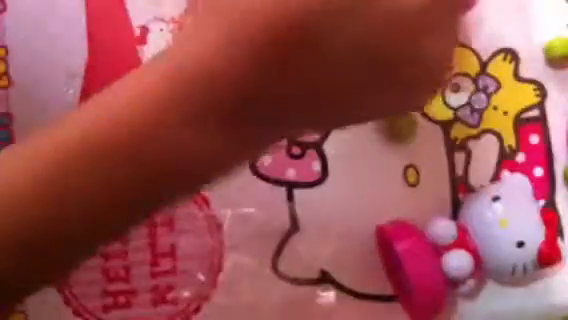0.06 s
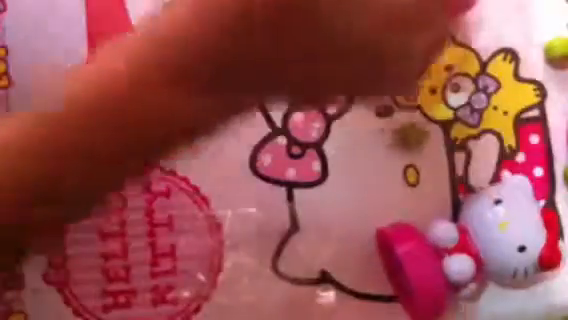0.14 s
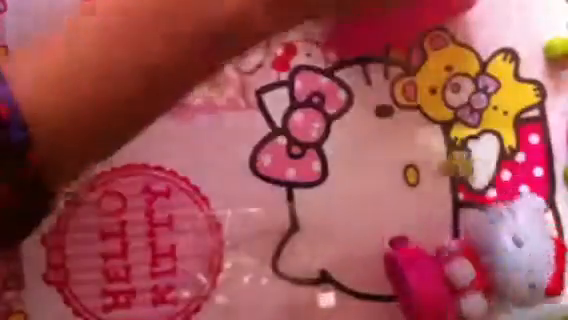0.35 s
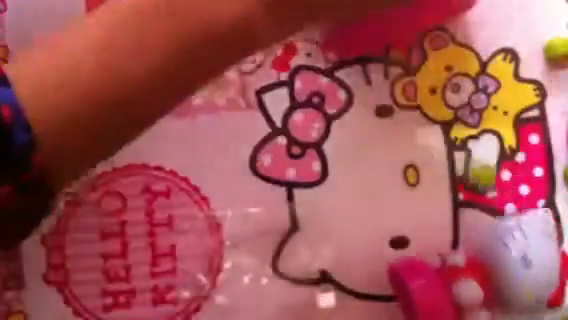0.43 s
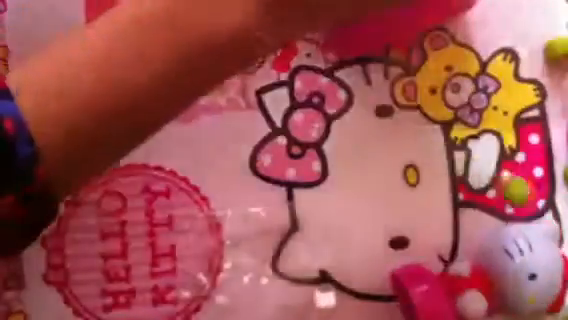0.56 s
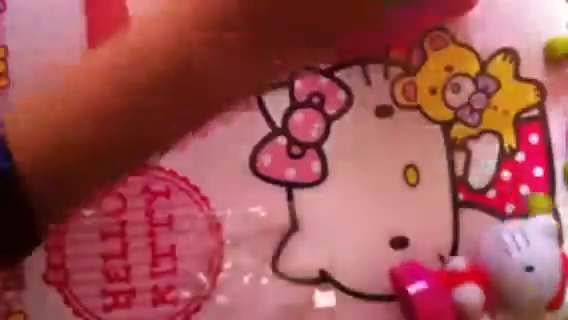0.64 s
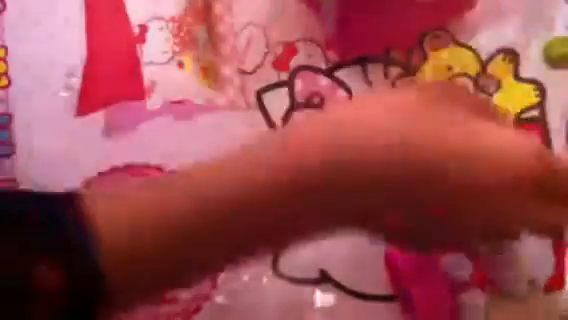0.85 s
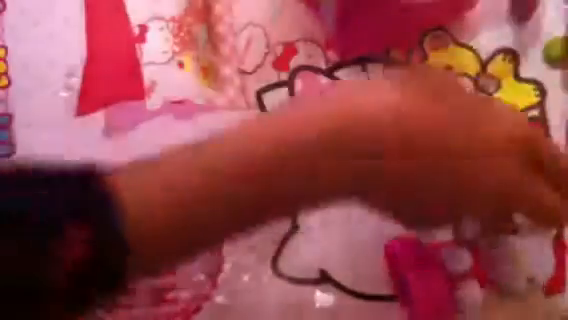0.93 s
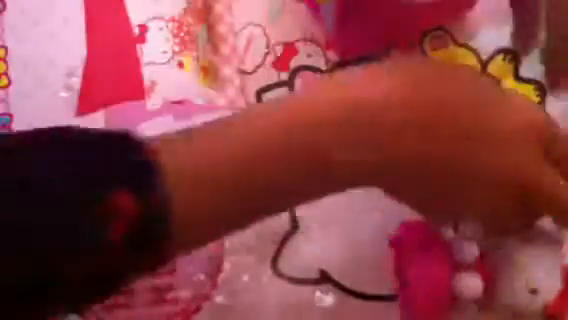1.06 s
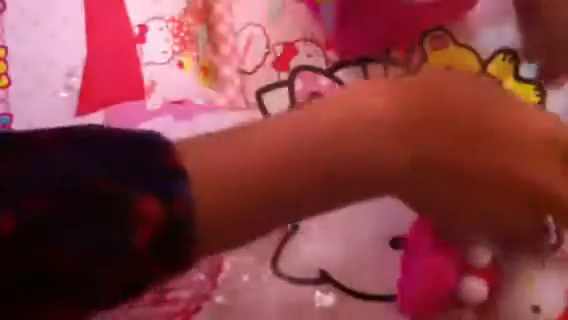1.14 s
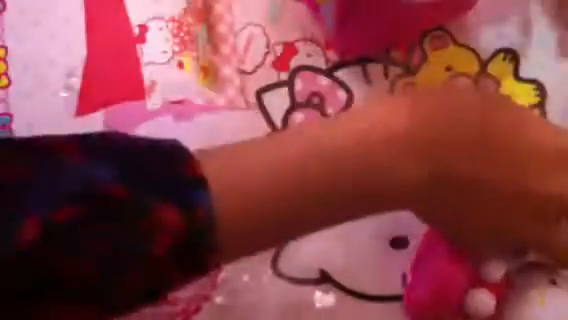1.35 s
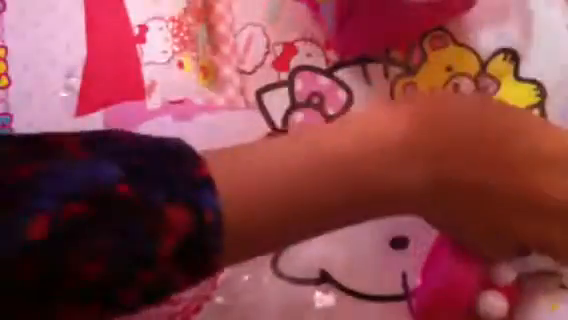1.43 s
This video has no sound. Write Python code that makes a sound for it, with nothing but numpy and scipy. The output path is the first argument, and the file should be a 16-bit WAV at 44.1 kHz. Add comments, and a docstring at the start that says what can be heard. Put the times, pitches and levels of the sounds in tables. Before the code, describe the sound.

Sharp, briefly ringing clacks come in two quick runs as a small hard ball bounces on a table and strikes a plastic toy. Light taps and a soft scrape end it, heard indoors through a thin-sounding microphone over faint hum.

```python
"""A small hard ball drops on a tabletop and clacks against a hollow plastic toy; a second run of clacks
bounces ever faster and dies out, then light taps and a soft scrape follow. Each contact is a sharp crack,
a short ring and a dull knock of the table, heard in a small room through a peaky microphone, over faint
hiss, hum and a thin whine."""
import sys
import numpy as np
from scipy import signal
from scipy.fft import rfft, irfft, next_fast_len
from scipy.io import wavfile
from scipy.ndimage import uniform_filter1d

SR = 44100
rng = np.random.default_rng(int(sys.argv[2]) if len(sys.argv) > 2 else 0)


def store_wav(level_fs):
    """Save 16-bit WAV to argv[1]."""
    pcm = np.round(np.clip(np.atleast_2d(level_fs), -1, 1) * 32767)
    wavfile.write(sys.argv[1], SR, pcm.T.astype(np.int16))


N = 66150
HIT_T = np.arange(8192) / SR
HIT_RISE = 1 - np.exp(-HIT_T / 0.00019)

# contact noise spectrum: f/Hz, level/dB
CRACK_SPECTRUM = [(100, -52), (600, -19), (950, -23.5), (1550, -14.5), (2050, 0.5), (3000, 0.5), (4000, -3),
                  (5000, -13), (8000, -9), (13000, -12), (16000, -9)]


def amp(db):
    """dB to gain."""
    return 10 ** (np.asarray(db) / 20)


def unit(x):
    """Scale to rms 1."""
    return x / np.sqrt(np.mean(x ** 2) + 1e-20)


def curve(points):
    """(f/Hz, value) rows to a function of Hz, interpolated on a log axis."""
    knots_hz, values = np.transpose(points)
    return lambda hz: np.interp(np.log(hz + 1), np.log(knots_hz + 1), values)


def coloured(x, db_of_hz):
    """Minimum-phase filter with the given dB curve."""
    size = 2 * next_fast_len(len(x))
    gain = amp(db_of_hz(np.fft.rfftfreq(size, 1 / SR)))
    cepstrum = irfft(np.log(gain), size)
    cepstrum[1:size // 2] *= 2
    cepstrum[size // 2 + 1:] = 0
    return irfft(rfft(x, size) * np.exp(rfft(cepstrum)), size)[:len(x)]


def burst(db_of_hz, t60_s, hold_s=0):
    """Decaying burst of dense, evenly strong partials, then coloured."""
    envelope = HIT_RISE * amp(-60 * np.maximum(HIT_T - hold_s, 0) / t60_s)
    x = rng.standard_normal(len(envelope)) * envelope
    for _ in range(4):
        flat = irfft(np.exp(1j * np.angle(rfft(x))), len(x))
        local_rms = np.sqrt(np.abs(uniform_filter1d(flat * flat, size=90)) + 1e-14)
        x = flat * envelope / local_rms
    return unit(coloured(x, db_of_hz)) * np.sqrt(np.mean(envelope ** 2))


def ringing(modes):
    """Struck modes as damped sines; rows: f/Hz, level/dB, t60/s."""
    return HIT_RISE * sum(amp(db - 60 * HIT_T / t60_s) * np.sin(2 * np.pi * (hz * HIT_T + rng.random()))
                          for hz, db, t60_s in modes)


def room(x, wet_db):
    """Direct sound plus a small room's tail, each frequency dying at its own rate."""
    # reverberation time: f/Hz, t60/s
    decay = [(150, 0.56), (500, 0.58), (2500, 0.24), (7000, 0.38), (14000, 0.25)]
    # tail colour: f/Hz, level/dB
    colour = [(150, -1.5), (500, -2.5), (2200, 1), (4500, -6.5), (7500, -8.5), (13000, 0.5)]
    hz, t, noise = signal.stft(rng.standard_normal(2 * len(x)), SR, nperseg=256)
    tail = signal.istft(noise * amp(-60 * t / curve(decay)(hz)[:, None]), SR, nperseg=256)[1]
    tail *= 1 - np.exp(-(np.arange(len(tail)) / SR / 0.005) ** 2)  # 5 ms build-up
    tail = coloured(tail / np.linalg.norm(tail), curve(colour))
    wet = amp(wet_db) * signal.fftconvolve(x, tail)
    return np.pad(x, (0, len(wet) - len(x))) + wet


def background(floor_db=-63, whine_hz=1697, whine_db=-72.5, whine_end_s=1):
    """Steady room hum and hiss; a thin whine that fades out."""
    # hum and hiss spectrum: f/Hz, level/dB
    floor_spectrum = [(20, -32.5), (45, -22.5), (87, -5.5), (130, -9), (200, -2.5), (320, -8.5), (600, -13),
                      (1500, -18.5), (3000, -20.5), (5000, -28), (10000, -30), (13000, -25), (16000, -35)]
    t = np.arange(N) / SR
    floor = unit(coloured(rng.standard_normal(N), curve(floor_spectrum)))
    fade = np.clip((whine_end_s - t) / 0.1, 0, 1)
    whine = np.sqrt(2) * np.sin(2 * np.pi * whine_hz * t) * fade
    return amp(floor_db) * floor + amp(whine_db) * whine


def crack(treble_db, band_hz, band_db, t60_s, spot, width_oct=0.14, fizz_hz=13320):
    """Sharp crack of a hard contact, with a brighter snap at the instant of impact."""
    # snap spectrum: f/Hz, level/dB
    snap_spectrum = [(2000, -24.5), (4000, -7.5), (7000, 0), (13000, 1), (16000, -11)]
    treble_shelf = curve([(3800, 0.078), (7500, 1)])
    fizz_db = 5.5 * (1 - 2 * spot)

    def bell(hz, centre_hz):
        return np.exp(-(np.log2((hz + 1) / centre_hz) / width_oct) ** 2)

    def spectrum_db(hz):
        tilted_db = curve(CRACK_SPECTRUM)(hz) + treble_db * treble_shelf(hz)
        return tilted_db + band_db * bell(hz, band_hz) + fizz_db * bell(hz, fizz_hz)

    body = burst(spectrum_db, t60_s, hold_s=0.003)
    snap = burst(curve(snap_spectrum), t60_s=0.0093, hold_s=0.0016)
    return body + amp(treble_db - 8) * snap


def table_knock():
    """Struck tabletop: returns its dull thud and its low ring."""
    # thud spectrum: f/Hz, level/dB
    thud_spectrum = [(40, -48), (130, -9.5), (270, 4.5), (400, -11.5), (570, 0.5), (800, -13.5),
                     (1250, -0.5), (2500, -25)]
    # tabletop modes: f/Hz, level/dB, t60/s
    modes = [(195, -13.5, 0.23), (272, -4, 0.078), (550.5, -1.5, 0.062)]
    return amp(-22.5) * burst(curve(thud_spectrum), t60_s=0.067), amp(-25.5) * ringing(modes)


def toy_ring(spot):
    """Ring of toy and table; mode levels depend on the spot struck, 0 to 1."""
    # per mode: f/Hz; level/dB at spot 0; level/dB at spot 1; t60/s
    mode_hz = [1215, 1810, 2006, 2064, 2178, 2700, 2794, 3008, 3118, 3292, 3458, 3568, 3888, 3972, 4310,
               6915, 7342, 7720]
    spot0_db = [-28.5, -19.5, -21.5, -12.5, -15.5, -8, 3.5, -22, -19, -14.5, -7, -6.5, -2.5, -0.5, -15.5,
                -25.5, -7, -8.5]
    spot1_db = [-20, -16.5, -14.5, -22, -7, -2.5, -12, -14.5, -5, -8.5, -7, -4, -5, -12, -14, -6.5, -21.5,
                -17]
    mode_t60_s = [0.053, .09, .13, 0.15, 0.092, 0.11, .09, 0.12, 0.16, .11, 0.061, 0.072, 0.078, 0.096,
                  0.11, .05, 0.046, 0.031]
    mode_db = spot0_db + spot * np.subtract(spot1_db, spot0_db)
    return ringing(zip(mode_hz, mode_db, mode_t60_s))


def ball():
    """Bouncing ball: each contact cracks, knocks the table and rings the toy."""
    # t/s, level/dB, treble/dB, knock/dB, band f/Hz, band gain/dB, crack t60/s, ring/dB, spot/0-1
    contacts = [ (0.227, -33.5, -13, 16.5, 3460, 1.5, 0.082, 3, 0.26),
                (.2333, -21, -4, 3.5, 3660, 5.5, 0.064, -0.5, 0.8),
                (.2466, -11, 2, -12.5, 4700, 5, .028, -0.5, 0.12),
                (0.339, -28.5, -8, 6, 2690, 9.5, .05, 2, 0.64),
                (0.37, -18.5, 0.5, 3.5, 2760, 4.5, 0.028, -1, 0),
                (0.4584, -26, -1.5, 3.5, 2290, 3.5, .035, 2, 0.55),
                (0.4907, -39.5, 2, 7.5, 2520, -1.5, 0.033, -3, 0.9),
                (0.6793, -34, 0, 11, 4300, -11, 0.039, -11, .9),
                (0.7445, -43, -12, 15, 3130, 8.5, 0.017, -26, 0.84),
                (0.7634, -20.5, 0, 1, 3150, 10.5, 0.044, 4.5, 1),
                (.7965, -41, -8, -2, 2800, 3, .07, -1, .8),
                (0.8139, -22.5, -1, -5.5, 1940, 3.5, .028, 1.5, 1),
                (.8420, -41, -6, 15, 3000, -15, 0.039, -1, 0.7),
                (.8800, -28, -0.5, -19, 3880, 7, .035, 6, 0.5),
                (.9095, -32.5, 0, -15, 3860, 11.5, 0.031, 6, 0.95),
                (.9305, -38, -1.5, -21, 3650, 8, 0.042, 1, 1),
                (.9445, -39.5, 0.5, -24.5, 2220, 11.5, .03, -4, 1),
                (.9555, -53, 9, -16, 2250, 15, 0.025, -6, 0.3),
                (1.0660, -55.5, -6, 16.5, 2700, 18, 0.029, -14, 0.6),
                (1.1957, -40.5, -3.5, 9.5, 3500, 5.5, 0.0064, -9, 0.76), ]
    out = np.zeros(N + SR)
    for start_s, level_db, treble_db, knock_db, band_hz, band_db, t60_s, ring_db, spot in contacts:
        impact = crack(treble_db, band_hz, band_db, t60_s, spot)
        thud, table_ring = table_knock()
        ring = amp(knock_db) * table_ring + amp(ring_db - 6.5) * toy_ring(spot)
        clack = room(impact + amp(knock_db) * thud, wet_db=-5) + room(ring, wet_db=-10.5)
        out[round(start_s * SR):][:len(clack)] += amp(level_db) * clack
    return out[:N]


def toy_tap(start_s=1.0825, gain_db=-38):
    """Light nudge of the toy: a click in the room and a dry ring."""
    # modes of the nudged toy: f/Hz, level/dB, t60/s
    modes = [(1626, -11.5, 0.093), (1836, -11, 0.052), (2440, -21, 0.045), (2690, -4, 0.063),
             (2880, -3.5, 0.054), (3507, 5, 0.032), (3946, 4, 0.035), (3830, 5.5, 0.039)]
    tilt_db = curve([(4000, -3.5), (6000, -8.5)])
    click = burst(lambda hz: curve(CRACK_SPECTRUM)(hz) + tilt_db(hz), t60_s=0.0317)
    tap = room(amp(0.5) * click, wet_db=-5.5)
    tap[:len(HIT_T)] += ringing(modes)
    return amp(gain_db) * np.pad(tap, (round(start_s * SR), N))[:N]


def scrape(peak_s=1.221, sigma_s=0.043, gain_db=-56.5):
    """Soft scrape on the table: a brief swell of rubbing noise."""
    t = np.arange(N) / SR
    tilt_db = curve([(1500, 3.5), (7000, -2)])
    rub = unit(coloured(rng.standard_normal(N), lambda hz: curve(CRACK_SPECTRUM)(hz) + tilt_db(hz)))
    swell = np.exp(-((t - peak_s) / sigma_s) ** 2 / 2)
    return amp(gain_db) * rub * swell


def scene():
    """Table sounds coloured by the microphone, over the background; mono."""
    # microphone treble peaks and notches: f/Hz, gain/dB
    mic_response = [(4700, -1), (5700, -11.5), (6350, -12.5), (6850, -4.5), (7350, 5.5), (8200, -6),
                    (8700, -2.5), (9400, -27), (9900, -15), (10250, -19), (10850, 1), (11800, -19),
                    (12500, -2), (13200, 1.5), (14200, -9.5), (15300, -14), (16000, -15)]
    table_sounds = ball() + toy_tap() + scrape()
    return (coloured(table_sounds, curve(mic_response)) + background())[None]


def record(dry):
    """Brick-wall low-pass."""
    cutoff_hz = 15850
    size = next_fast_len(N + SR // 2)
    passband = np.fft.rfftfreq(size, 1 / SR) < cutoff_hz
    return irfft(rfft(dry, size) * passband, size)[..., :N]


dry = scene()
out = record(dry)
store_wav(out)
```